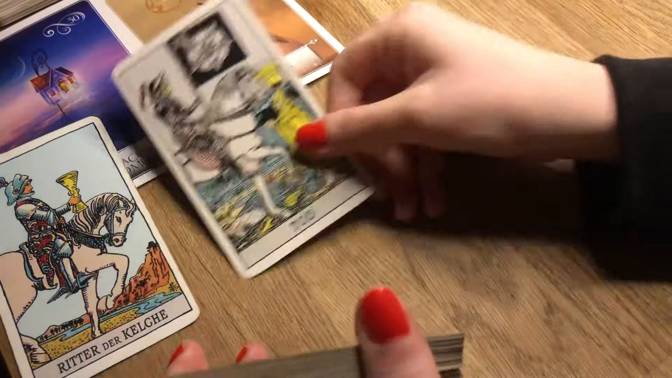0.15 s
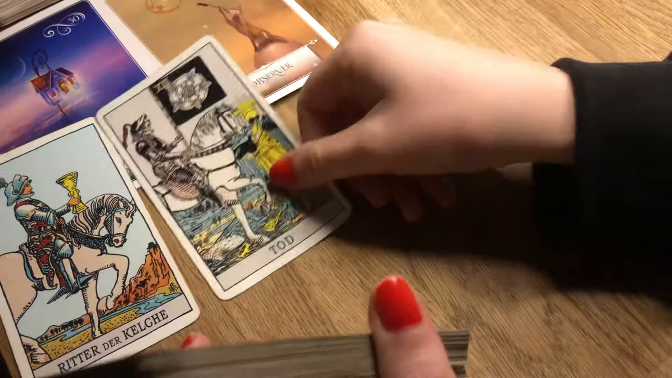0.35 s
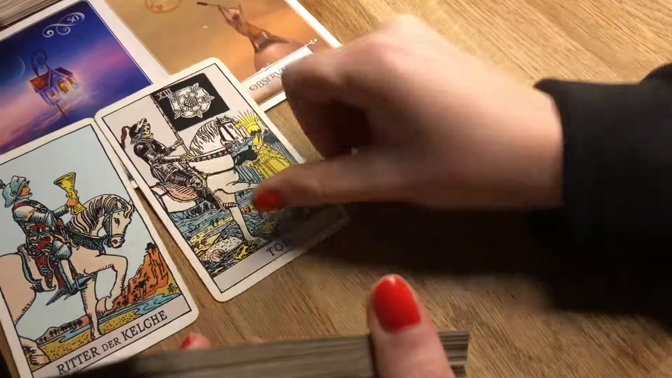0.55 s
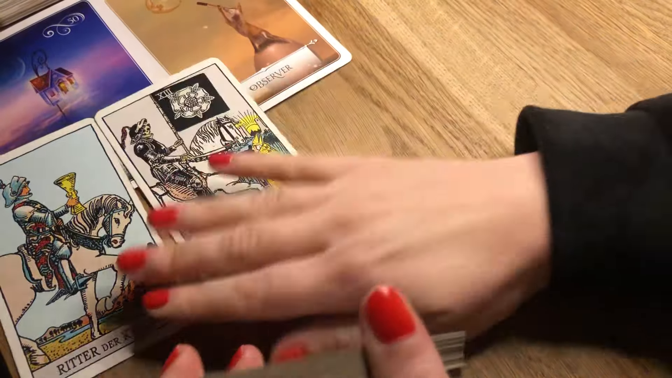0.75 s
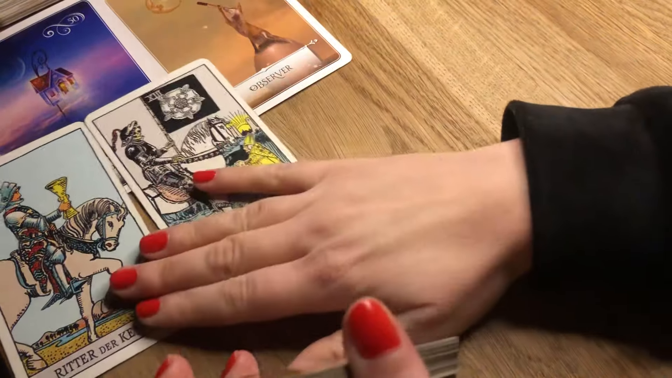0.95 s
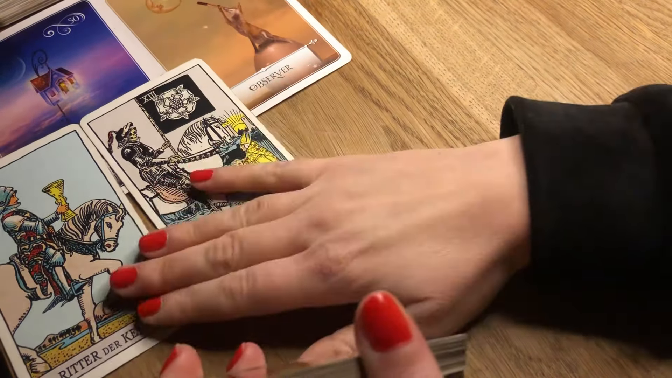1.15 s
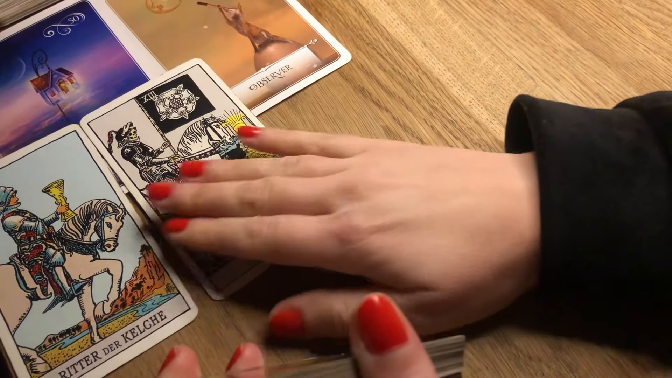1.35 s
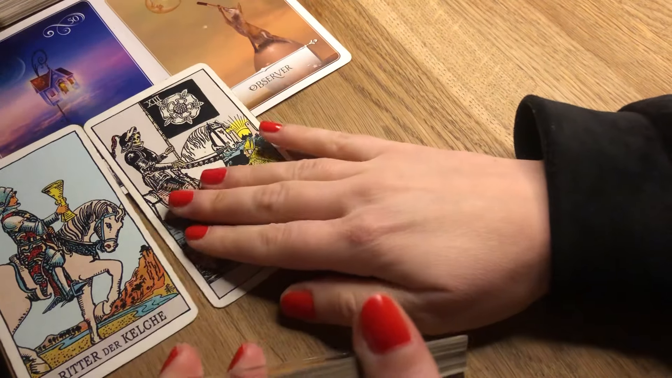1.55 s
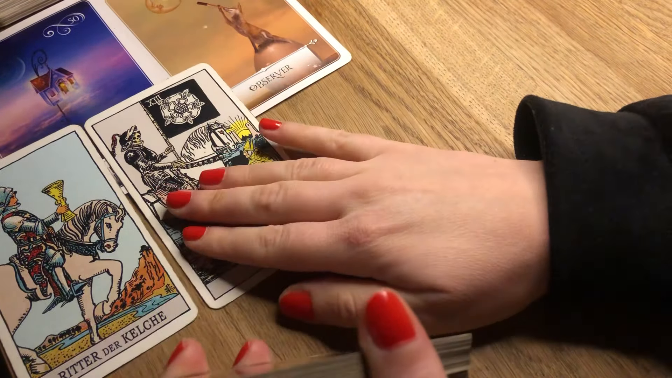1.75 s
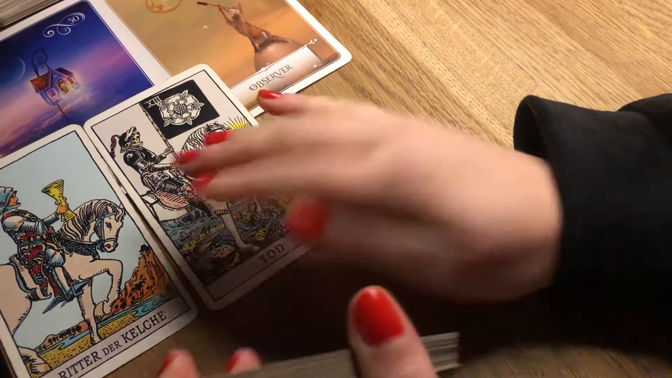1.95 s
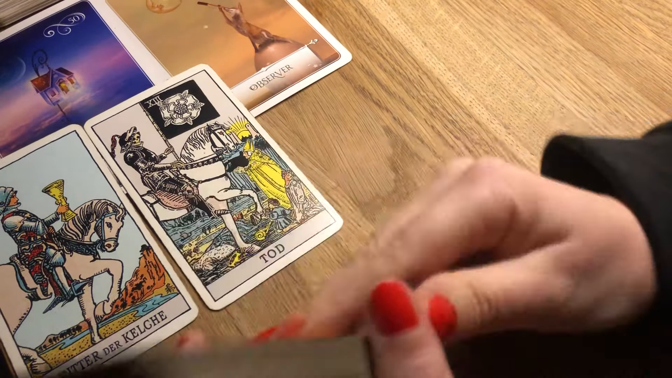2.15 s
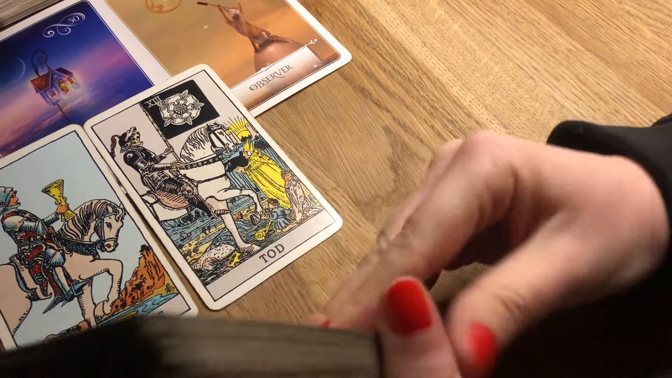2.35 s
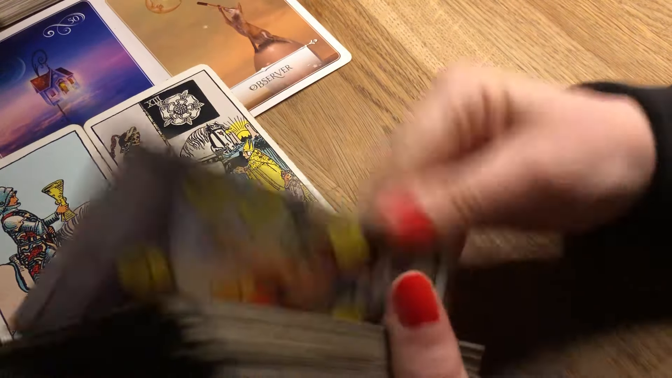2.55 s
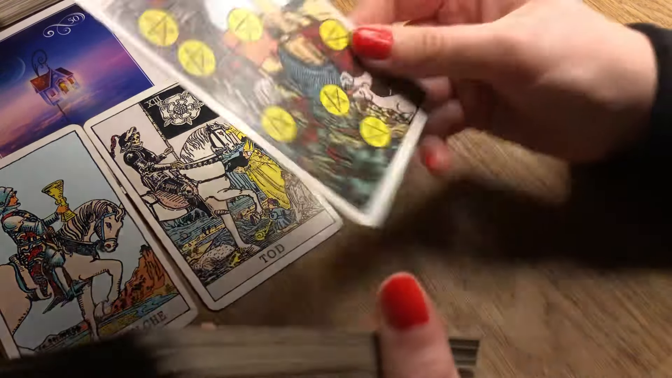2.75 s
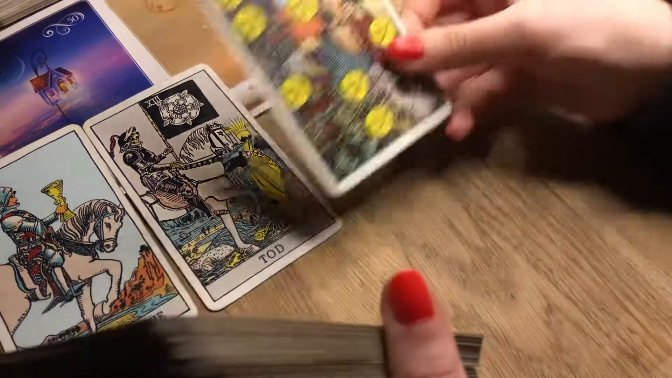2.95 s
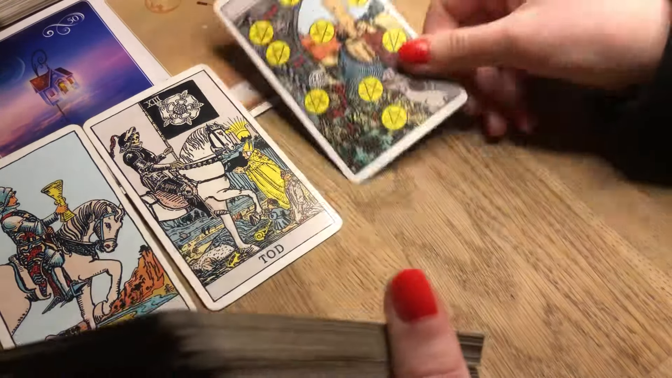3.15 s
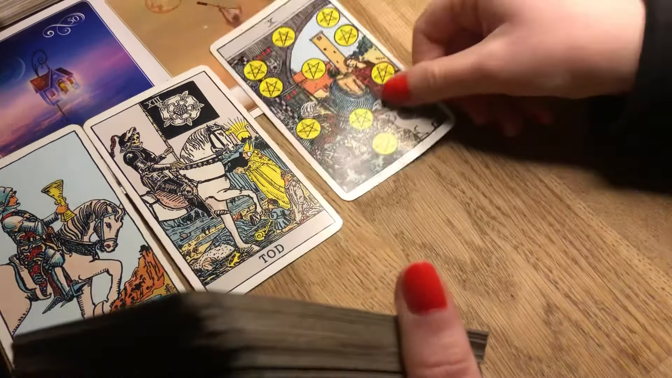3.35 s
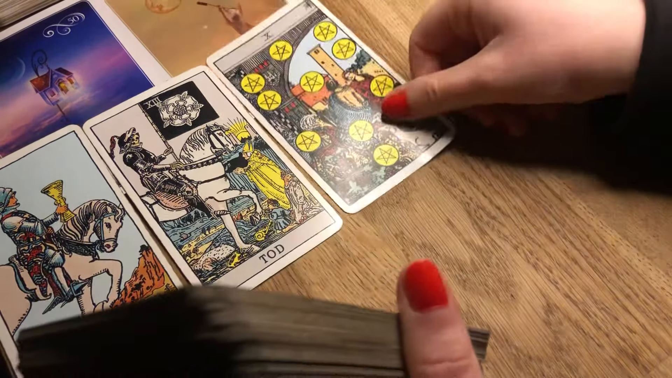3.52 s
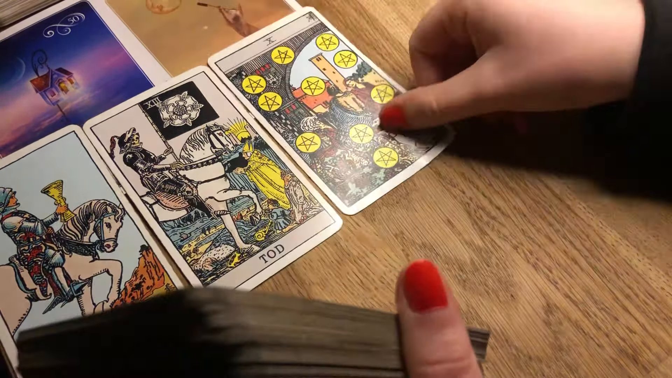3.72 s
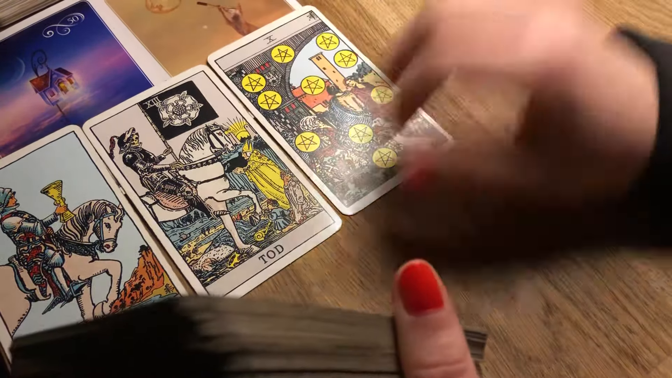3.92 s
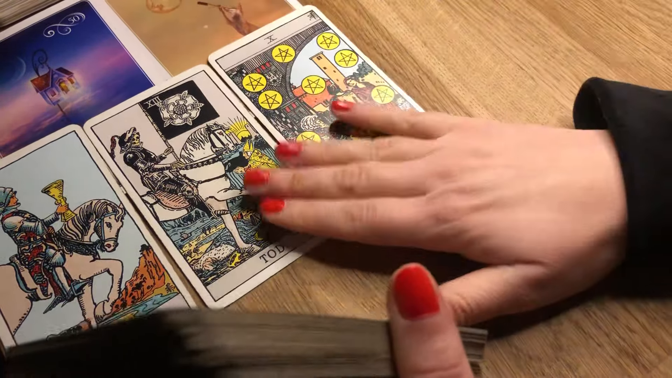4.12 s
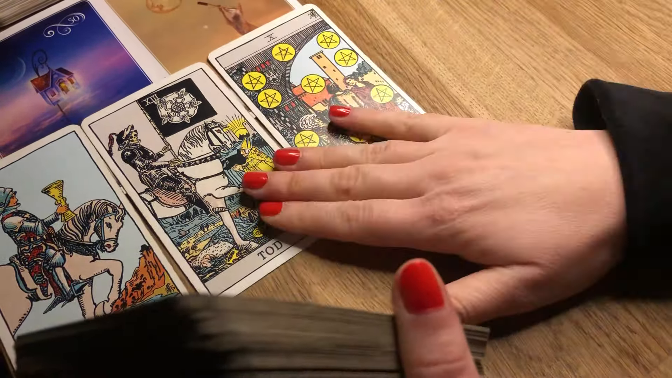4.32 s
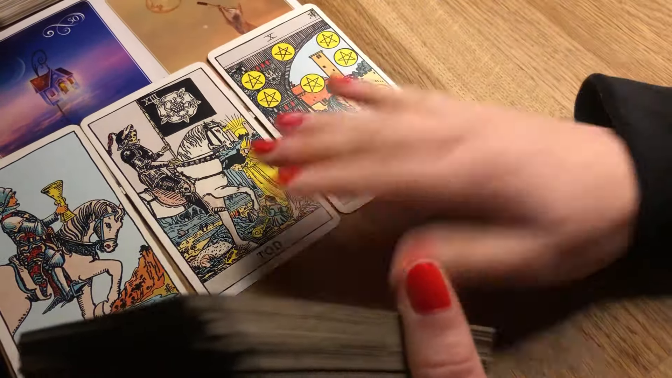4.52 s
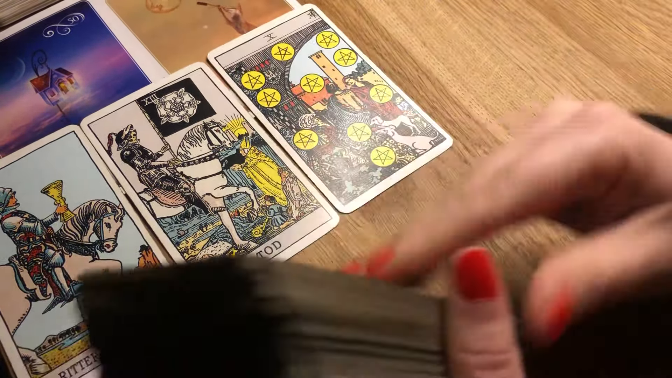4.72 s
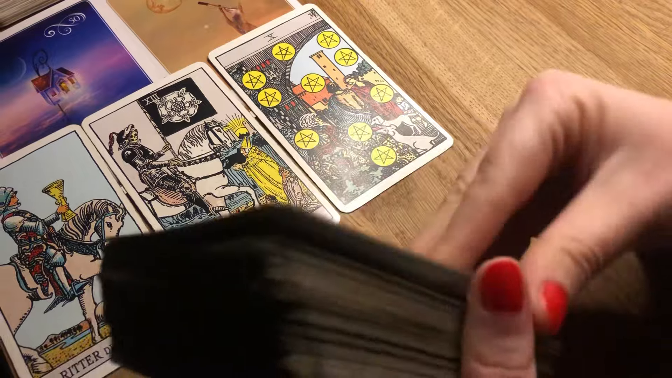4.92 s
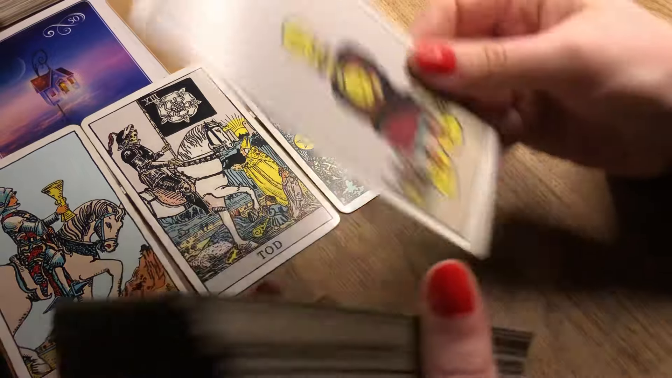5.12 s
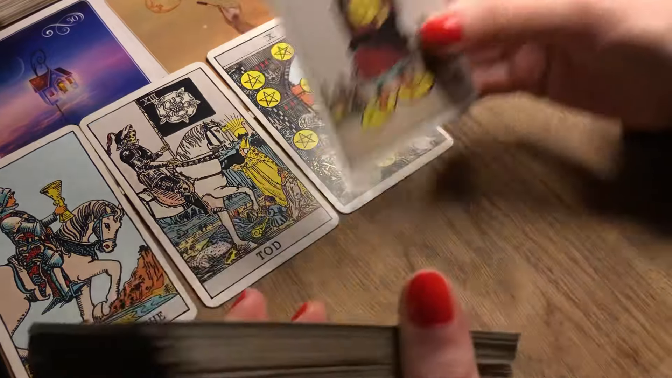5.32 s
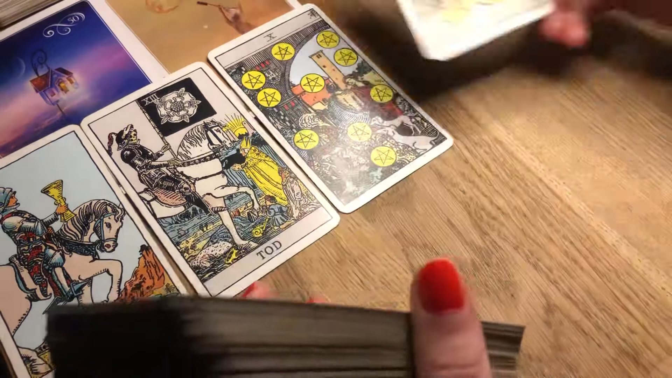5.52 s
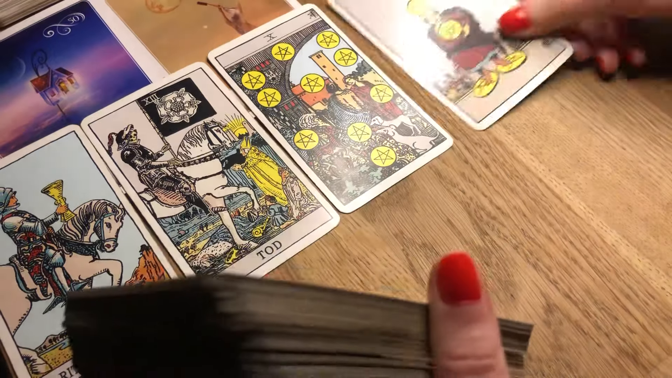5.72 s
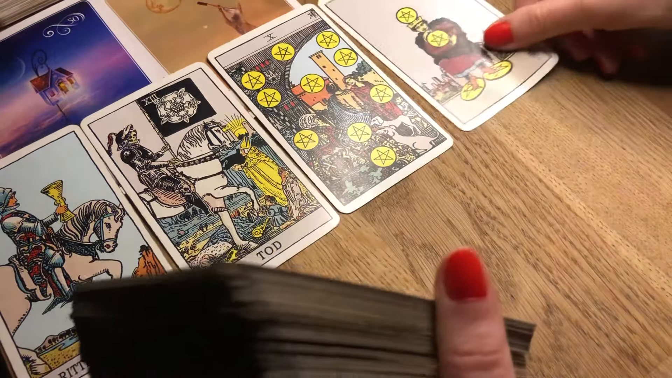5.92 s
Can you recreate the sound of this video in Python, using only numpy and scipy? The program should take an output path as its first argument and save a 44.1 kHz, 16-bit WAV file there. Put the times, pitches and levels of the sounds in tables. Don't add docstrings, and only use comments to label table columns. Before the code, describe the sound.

Close to a small microphone in a quiet, lightly echoing room, a card rustles and its edge snaps brightly on a wooden table. Soft hand rubbing and nail ticks follow. Another card scrapes off the deck, which flaps back with a hollow knock, and that card snaps down too. A second scrape and knock come near the end, then rustles and a light corner click.

```python
import sys
import numpy as np
from scipy import signal
from scipy.io import wavfile
from scipy.ndimage import uniform_filter1d

SR = 44100
rng = np.random.default_rng(int(sys.argv[2]) if len(sys.argv) > 2 else 0)


def volts_from_decibels(level):
    exponent = np.asarray(level, float) / 20
    return 10 ** exponent


def materialize(psi):
    bounded = np.clip(np.atleast_2d(psi).T, -1, 1)
    quanta = np.round(bounded * 32767).astype(np.int16)
    wavfile.write(sys.argv[1], SR, quanta)


N = 263277


def evened(x):
    return x / np.sqrt(np.mean(x ** 2) + 1e-20)


def read(points, hz):
    point_hz, value = np.transpose(points)
    return np.interp(np.log(hz + 1), np.log(point_hz + 1), value)


def add(mix, s, sound):
    part = mix[round(s * SR):][:len(sound)]
    part += sound[:len(part)]


def band(x, lo_hz, hi_hz):
    sos = signal.butter(2, [lo_hz, min(hi_hz, .45 * SR)], "bandpass", fs=SR, output="sos")
    return signal.sosfilt(sos, x)


def resonate(x, hz, width):
    turn = np.exp(2j * np.pi * np.cumsum(hz * np.ones(len(x))) / SR)
    r = np.exp(-np.pi * width / SR)
    return 2 * (turn * signal.lfilter([1 - r], [1, -r], x / turn)).real


def ring(db, hz, t60, rise):
    t = np.arange(int(SR * t60) + 8) / SR
    wave = np.sin(2 * np.pi * hz * t) * volts_from_decibels(-60 * t / t60)
    wave = wave * (1 - np.exp(-(t * hz / rise) ** 2))
    return volts_from_decibels(db) * wave / abs(wave).max()


def air():
    # pitch in Hz, level in dB per Hz.
    air_colour = [(25, -20), (135, -6), (300, -8.5), (600, -15.5), (1400, -23), (5270, -29), (15200, -34.5),
                  (16300, -48.5)]
    # pitch in Hz, rms level in dB.
    whine_tones = [(7654, -79), (15308, -97), (65.7, -85.5)]
    frames, hz = N // 256 + 5, np.fft.rfftfreq(1024, 1 / SR)
    a, b, patches = rng.standard_normal((frames, 513, 3)).T
    patches = uniform_filter1d(uniform_filter1d(patches, 10, 0), 14, 1)
    z = (a + 1j * b) * volts_from_decibels(read(air_colour, hz)[:, None] + 1.3 * evened(patches))
    noise = signal.istft(z, nperseg=1024, noverlap=768)[1][:N]
    t = np.arange(N) / SR
    whine = sum(np.sqrt(2) * volts_from_decibels(db) * np.sin(2 * np.pi * f * t) for f, db in whine_tones)
    return volts_from_decibels(-70.5) * evened(noise) + whine


def tail(colour):
    # pitch in Hz, time to fall by 60 dB in seconds.
    ring_times = [(120, 0.67), (400, 0.32), (1000, 0.39), (3000, 0.36), (7000, 0.31), (14000, 0.29)]
    hz, t, z = signal.stft(rng.standard_normal(SR // 2), SR, nperseg=512)
    shape_db = read(colour, hz)[:, None] - 60 * t / read(ring_times, hz)[:, None]
    wash = signal.istft(z * volts_from_decibels(shape_db), SR, nperseg=512)[1]
    wash = wash * np.clip((np.arange(len(wash)) / SR - .003) / .014, 0, 1)
    return wash / np.sqrt(np.mean(wash[700:2500] ** 2))


def narrow_bands(table, level_db):
    flat = tail([(20, 0), (20000, 0)])
    out = 0
    for hz, width, db in table:
        narrow = resonate(resonate(flat, hz, width), hz, width)
        out = out + volts_from_decibels(level_db + db) * np.sqrt(SR / width / 2) * narrow
    return out


def room(x):
    # start in seconds, level in dB,
    # gap between the two main strokes in seconds, share of the second stroke.
    blows = [
        (.459, -44, .0014, 0.29),
        (3.735, -43.5, .0018, 0.13),
        (2.67, -56, .0063, 0.29),
        (5.124, -52, .0057, 0.38),
        (3.4, -68.5, 0.0026, 0.28),
        (2.31, -67, 0.0023, 0.16),
        (4.229, -66.5, .0031, 0.27),
        (5.64, -70.5, 0.0034, 0.26),
    ]
    # pitch in Hz, level in dB.
    slap_colours = [
        [(88, -42.5), (323, 2), (508, -20), (916, -9), (1310, -15), (5480, -16), (15300, -30), (16500, -43)],
        [(88, -38.5), (317, 4), (488, -12.5), (723, -9.5), (2500, -19), (10100, -21.5), (15000, -30),
         (16500, -40)],
    ]
    # pitch in Hz, level in dB.
    flap_colours = [
        [(88, -35), (150, -17), (392, -6.5), (584, -22), (1500, -10), (2510, -31.5), (4000, -59), (8800, -120)],
        [(88, -43.5), (150, -22), (324, -8), (450, -17), (1300, -5.5), (1900, -13.5), (4000, -42.5),
         (8800, -120)],
    ]
    # pitch in Hz, level in dB.
    thud_colours = [
        [(35, -26), (60, 7), (350, -21), (700, -14), (910, -44), (1540, -120)],
        [(35, -42), (60, -13), (204, -3.5), (864, -22.5), (1060, -1), (1500, -49), (1950, -67.5), (3300, -120)],
        [(35, -37.5), (60, -4), (134, -4), (803, -14), (1200, -28), (1560, -55.5), (2640, -120)],
        [(35, -29), (60, -1), (402, -10), (690, -26), (910, -52), (1540, -120)],
    ]
    # pitch in Hz, width in Hz, level in dB.
    hollows = [
        [(717, 47, -3.5), (947, 80, -1.5), (1485, 32, -11.5), (1660, 87, -10), (1940, 45.5, -14.5)],
        [(825, 71, -3.5), (983, 110, -4), (1366, 52.6, -5.5), (2010, 46, -20.5)],
    ]
    # pitch in Hz, width in Hz, level in dB.
    slap_bands = [(3710, 180, -2), (4610, 120, -2.5), (5570, 56, 1.5), (6270, 150, -2), (7120, 150, -3),
                  (7960, 46, -8.5)]
    even = tail([(20, 0), (20000, 0)])
    out = signal.fftconvolve(x, even / np.linalg.norm(even))[:N]
    for (s, db, gap, share), colour in zip(blows, slap_colours + flap_colours + thud_colours):
        wash = volts_from_decibels(db) * tail(colour)
        add(out, s, wash)
        add(out, s + gap, share * wash)
    for (s, *_), table in zip(blows[2:], hollows):
        add(out, s, narrow_bands(table, -50.5))
    add(out, blows[0][0], narrow_bands(slap_bands, -58))
    return out


def rub(t, db, hiss_db, body_db, hz):
    slips = rng.standard_normal((3, len(t))) * volts_from_decibels(2.2 * np.minimum(rng.exponential(1, len(t)), 4))
    flutter = volts_from_decibels(2.0 * evened(uniform_filter1d(rng.standard_normal(len(t)), 300)))
    card = evened(1.1 * evened(resonate(slips[0], hz, 1200)) + evened(band(slips[1], 1700, 6800)))
    hiss = volts_from_decibels(hiss_db) * evened(band(slips[1], 4300, 13000))
    body = volts_from_decibels(body_db) * evened(band(slips[2], 350, 1700))
    fade = np.clip(np.minimum(t - t[0], t[-1] - t) / 0.0064, 0, 1)
    return t[0], volts_from_decibels(db) * flutter * (card + hiss + body) * fade


def rustle(start, top, end, db, *colour):
    t = np.arange(max(start, 0), end, 1 / SR)
    away = abs(np.interp(t, [start, top, end], [-1, 0, 1]))
    return rub(t, db - 16 * away ** 1.5, *colour)


def slides(out):
    # start in seconds, strongest moment in seconds, end in seconds, level in dB.
    slide_moves = [(0.068, .11, .24, -63.5), (.17, .225, .44, -64.5), (.422, .45, .459, -50),
                   (0.571, .6, .78, -70.5), (.76, .872, 1.04, -71.5), (1.33, 1.45, 1.56, -71),
                   (3.107, 3.14, 3.24, -73), (3.199, 3.255, 3.4, -72), (3.399, 3.47, 3.6, -70.5),
                   (3.641, 3.66, 3.8, -67), (3.841, 3.88, 4.2, -71), (4.481, 4.63, 4.73, -71),
                   (5.64, 5.725, 5.85, -65.5), (5.815, 5.87, 5.97, -73)]
    for row in slide_moves:
        add(out, *rustle(*row, -13, -4.5, 3500))


def brushes(out):
    # start in seconds, strongest moment in seconds, end in seconds, level in dB.
    brush_moves = [(0.0, 0.039, .095, -63), (1.249, 1.331, 1.44, -70.5), (1.932, 2.0, 2.17, -69),
                   (2.06, 2.13, 2.25, -73), (2.248, 2.283, 2.29, -73), (2.388, 2.449, 2.5, -75),
                   (2.719, 2.794, 2.89, -64), (2.858, 2.92, 3.0, -65), (2.939, 2.99, 3.11, -70),
                   (4.102, 4.164, 4.24, -85), (4.482, 4.583, 4.72, -80), (3.92, 3.98, 4.08, -82),
                   (4.708, 4.758, 4.79, -73), (4.791, 4.875, 4.96, -67.5), (5.151, 5.268, 5.4, -67),
                   (5.321, 5.447, 5.63, -66)]
    for row in brush_moves:
        add(out, *rustle(*row, -2, -4, 3640))


def pulls(out):
    # time in seconds, finger pressure in dB, grip of the fingertip heard as fine hiss in dB.
    pull_moves = [
        [(2.485, -68, -10), (2.543, -61.5, -11), (2.572, -49.5, -2), (2.602, -44.5, -21), (2.645, -49, -1.5),
         (2.657, -44.5, 5.5)],
        [(4.978, -57.5, -9), (4.998, -56, -1.5), (5.04, -47.5, -19.5), (5.06, -49, -18), (5.098, -46, -9),
         (5.106, -36, -20.5)],
    ]
    for rows in pull_moves:
        s, db, hiss_db = np.transpose(rows)
        t = np.arange(s[0], s[-1], 1 / SR)
        hz = np.linspace(4400, 2900, len(t))
        add(out, *rub(t, np.interp(t, s, db), np.interp(t, s, hiss_db), -11, hz))


def patchy(x, patch_db):
    z = signal.stft(x, nperseg=256)[2]
    patches = uniform_filter1d(uniform_filter1d(rng.standard_normal(z.shape), 6, 0), 4, 1)
    return signal.istft(z * volts_from_decibels(patch_db * evened(patches)), nperseg=256)[1][:len(x)]


def hands():
    out = np.zeros(N)
    pulls(out)
    slides(out)
    brushes(out)
    return patchy(out, patch_db=2.0)


def scuffs():
    # start in seconds, rms level in dB, middle pitch in Hz, length in seconds.
    scuff_events = [(.025, -57, 8500, .008), (1.15, -72, 7000, .02), (2.278, -60, 6000, .015),
                    (2.463, -59, 4500, .022), (2.463, -63, 1000, .022), (2.636, -50, 9000, .021),
                    (2.915, -62, 5000, .02), (3.255, -64, 3000, .015), (.436, -54, 4000, .021),
                    (4.15, -66, 5500, .012), (4.462, -68, 9000, .018), (3.7295, -50, 3500, .004),
                    (4.74, -62, 6000, .02), (4.83, -64, 6000, .012), (5.1055, -41, 6500, .006)]
    out = np.zeros(N)
    for s, db, hz, length in scuff_events:
        noise = rng.standard_normal(1500)
        scuff = evened(band(noise, hz * 0.32, hz * 1.8))[:int(length * SR)]
        add(out, s, volts_from_decibels(db) * scuff * signal.windows.tukey(len(scuff), .4))
    return out


def ticks():
    # start in seconds, peak in dB, middle pitch in
    # Hz, time to fall by 60 dB in seconds.
    tick_events = [(.026, -63, 5000, 0.012), (.22, -47, 1580, 0.023), (.346, -50, 2980, .01),
                   (0.8609, -48.5, 3500, 0.0093), (1.893, -56.5, 5000, .008), (2.145, -42.5, 4500, 0.0065),
                   (2.164, -50, 5960, 0.0053), (2.397, -52, 4500, 0.0067), (3.538, -57.5, 3500, 0.01),
                   (3.683, -44.5, 4040, 0.0053), (4.144, -62, 6000, 0.0063), (4.478, -53.5, 2800, 0.0083),
                   (4.8953, -49.5, 2500, 0.01), (4.9556, -47, 2180, 0.019), (4.9713, -42, 2920, 0.0198),
                   (5.448, -47.5, 1800, 0.011), (5.8567, -49.5, 3500, .007), (5.929, -51.5, 3980, .007),
                   (.0912, -35, 1600, .018), (3.1185, -39, 2300, .008), (3.6506, -52, 3500, .006),
                    (4.741, -47, 3500, .006), (5.6366, -34, 2600, .011), (5.647, -50, 1200, .01)]
    out, t = np.zeros(N), np.arange(1500) / SR
    for s, db, hz, t60 in tick_events:
        contact = (t == 0) + 0.23 * rng.standard_normal(1500)
        tick = band(contact * volts_from_decibels(-60 * t / t60), hz * 0.19, hz * 2.2)
        add(out, s, volts_from_decibels(db) * tick / abs(tick).max())
    return out


def thumps():
    # start in seconds, peak in dB, pitch in Hz, time to fall by 60 dB in seconds.
    table_pushes = [(.091, -52, 298, 0.024), (0.464, -34, 234.6, 0.021), (1.326, -58, 88, 0.08),
                    (2.312, -51, 231.6, 0.035), (2.315, -56, 113.7, .12), (2.311, -53.5, 970, 0.017),
                    (2.667, -30.5, 232, 0.039), (3.7359, -25.5, 650, 0.004), (3.7399, -31, 305, 0.019),
                    (4.23, -55, 319, 0.041), (4.231, -56.5, 800, 0.017), (4.236, -57.5, 119.3, 0.11),
                    (4.87, -59, 285, 0.06), (5.112, -37.5, 299, 0.023), (5.121, -33, 261, 0.039),
                    (5.64, -51, 207, 0.022), (5.645, -58, 73.6, .15), (5.854, -58, 197, 0.057),
                    (0.1, -60, 139, 0.095), (0.466, -48, 90.7, 0.11), (2.672, -44.5, 103, 0.041),
                    (3.743, -49, 69.2, 0.12), (5.124, -42, 101.3, 0.098)]
    out = np.zeros(N)
    for s, db, hz, t60 in table_pushes:
        add(out, s, ring(db, hz, t60, rise=0.63))
        add(out, s, ring(db - 5.0, hz * 1.45, t60 * 1.5, rise=0.26))
    return out


def flaps():
    # start in seconds, peak in dB, pitch in Hz, time to fall by 60 dB in seconds.
    bounces = [
        (2.6612, -34, 720, .018),
        (2.6673, -17.5, 900, .007),
        (2.6704, -18.5, 960, .008),
        (2.673, -27, 1500, .007),
        (2.676, -28, 1350, .01),
        (5.115, -32, 800, .02),
        (5.1214, -14, 1030, .0048),
        (5.1244, -17, 1050, .006),
        (5.1267, -16, 1180, .0045),
        (5.1297, -22, 1020, .005),
    ]
    out = np.zeros(N)
    for s, db, hz, t60 in bounces:
        add(out, s, ring(db, hz, t60, rise=1.08))
        add(out, s, ring(db - 7.5, hz * 0.68, t60, rise=1.0))
        add(out, s + 0.00087, ring(db - 23, hz * 2.6, 0.0065, rise=0.89))
    return out


def snaps():
    # start in seconds, peak in dB, middle pitch in Hz,
    # time for the ring to fall by 60 dB in seconds, crackle in dB.
    strokes = [(.4573, -24, 6000, .002, -9), (.4579, -14, 4300, .0022, -14), (.4581, -14, 8800, .0012, -20),
               (.4579, -19, 15000, .0008, -20), (.45935, -5, 8500, .001, -14),
               (.4594, -16, 6000, .0012, -30), (.45937, -11, 14000, .0006, -30),
               (.4594, -17, 3800, .0015, -30), (3.7334, -28, 4000, .002, -8),
               (3.7339, -22, 3500, .0018, -12), (3.7341, -20, 12500, .001, -20),
               (3.7341, -24, 8000, .0015, -20), (3.7355, -10, 8500, .0018, -10),
               (3.73553, -11.5, 11600, .0016, -30), (3.7355, -19, 3600, .0015, -30)]
    out, t = np.zeros(N), np.arange(500) / SR
    for s, db, hz, t60, crackle_db in strokes:
        add(out, s - .00012, ring(db, hz, t60, rise=.7))
        crackle = band(rng.standard_normal(500), 3200, 11500) * volts_from_decibels(crackle_db - 60 * t / 0.019)
        add(out, s, volts_from_decibels(db) * crackle * (1 - np.exp(-t / .0005)))
    return out


def scene():
    rubbing, snap = hands(), snaps()
    knock = flaps() + thumps()
    tick = ticks() + scuffs()
    wet = volts_from_decibels(-21) * snap + volts_from_decibels(-17) * knock + volts_from_decibels(-11.0) * tick + volts_from_decibels(-15) * rubbing
    return (snap + knock + tick + rubbing + room(wet) + air())[None]


def band_limit(x):
    return signal.sosfilt(signal.butter(12, 17340, fs=SR, output="sos"), x)


def record(dry):
    bass_cut = signal.butter(3, 42, "highpass", fs=SR, output="sos")
    top_cut = signal.firwin(101, 16300, window=("kaiser", 5), fs=SR)
    mix = signal.sosfilt(bass_cut, dry)
    mix = signal.oaconvolve(mix, top_cut[None], "same")
    return band_limit(mix)


dry = scene()
out = record(dry)
materialize(out)
```